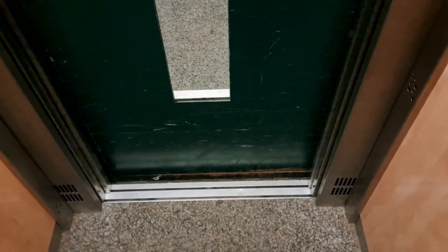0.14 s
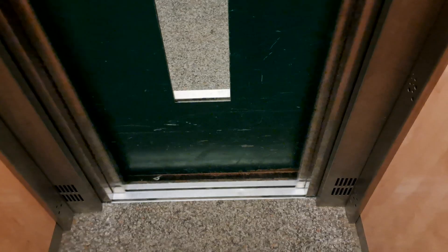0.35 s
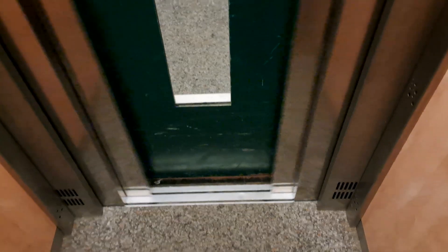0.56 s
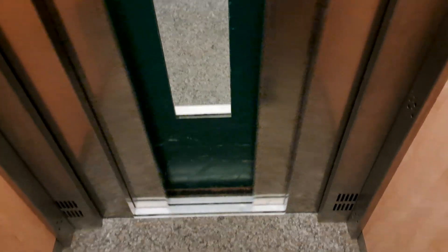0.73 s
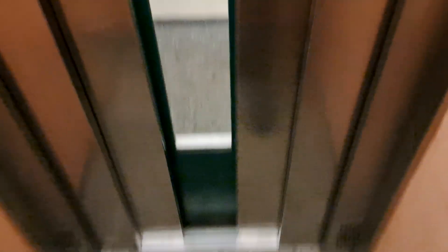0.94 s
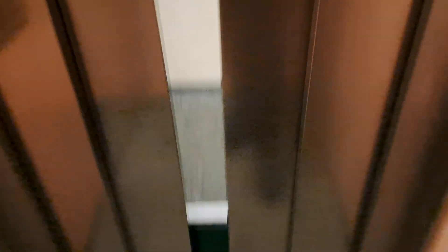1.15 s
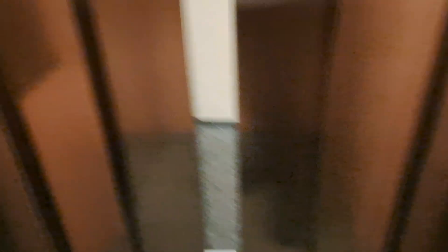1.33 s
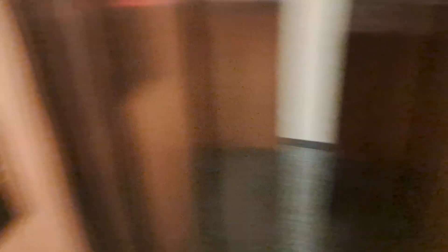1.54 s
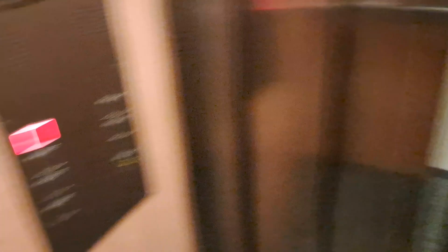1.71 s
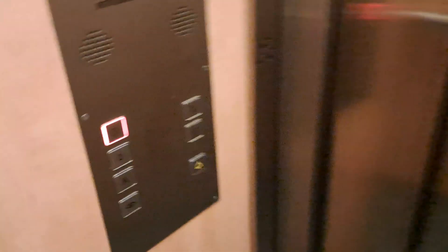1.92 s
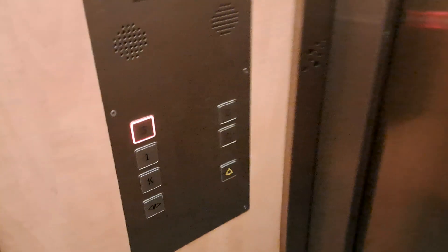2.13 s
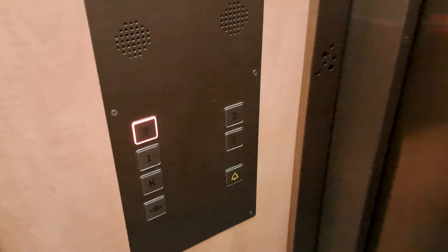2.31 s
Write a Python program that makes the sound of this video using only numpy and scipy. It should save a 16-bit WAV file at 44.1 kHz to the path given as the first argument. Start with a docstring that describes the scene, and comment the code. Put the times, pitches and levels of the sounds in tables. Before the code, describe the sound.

Sliding lift doors close, heard inside a small car: a brief thin squeal, catch ticks and a hard latch clack, then rolling panels with hiss and squeaks, fading before a soft boomy thud. Close stereo microphone.

```python
"""Inside a small lift car, a stereo microphone hears telescopic doors driven shut in a low hum and still air.
A thin squeal and short squeaks (narrowed noise), catch ticks and latch clacks (struck modes with a crack of
noise), with panels that roll and hiss (bumped resonances, shaped noise), sing and fade. They meet with
a thud that booms in the car's low modes (swelling sines). A faint steady whine lies above it all.
"""
import sys
import numpy as np
from scipy import signal
from scipy.fft import rfft, irfft
from scipy.io import wavfile
from scipy.ndimage import uniform_filter1d

SR = 44100
rng = np.random.default_rng(int(sys.argv[2]) if len(sys.argv) > 2 else 0)


def gain_from_decibels(decibels):
    """Convert decibel values to linear amplitude factors."""
    exponent = np.asarray(decibels, float) / 20
    return 10 ** exponent


def persist_wave(psi):
    """Save psi, clipped to +-1, as 16-bit WAV."""
    counts = np.round(np.clip(psi, -1, 1) * 32767).astype(np.int16)
    wavfile.write(sys.argv[1], SR, np.atleast_2d(counts).T)


N = 108706
T = np.arange(N) / SR


def evened(x):
    """Scales to unit rms."""
    return x / np.sqrt(np.mean(x ** 2) + 1e-20)


def column(table, index):
    """One column of a curve, drawn sample by sample between its times."""
    rows = np.array(table)
    return np.interp(T, rows[:, 0], rows[:, index])


def read(points, hz):
    """A spectrum table read on a log-frequency axis."""
    f, value = np.transpose(points)
    return np.interp(np.log(hz + 1), np.log(f + 1), value)


def coloured(x, points):
    """Filters along time by a spectrum table; unit rms."""
    hz = np.fft.rfftfreq(x.shape[-1], 1 / SR)
    spectrum = rfft(x) * gain_from_decibels(read(points, hz))
    return evened(irfft(spectrum, x.shape[-1]))


def resonate(x, hz, width):
    """Shifts hz down to zero, smooths, and shifts back: a resonance of gain 1."""
    turn = np.exp(2j * np.pi * np.cumsum(hz * np.ones(x.shape[-1])) / SR)
    r = np.exp(-np.pi * width / SR)
    smoothed = signal.lfilter([1 - r], [1, -r], x / turn)
    return 2 * (turn * smoothed).real


def slow(rate_hz):
    """Smooth chance, unit rms: noise averaged twice over 1 / rate_hz."""
    size = max(int(SR / rate_hz), 2)
    noise = rng.standard_normal(N)
    return evened(uniform_filter1d(uniform_filter1d(noise, size), size))


def shake():
    """The door drive keeps the car's low modes humming, each wavering in pitch and strength."""
    # low modes of the car: [f/Hz, level/dB, waver/Hz, share taken of the other modes' relative level]
    car_modes = [(31.9, -7, 8.1, 0.0067), (52.3, 1, 2.75, 0.01), (78.4, 0.5, 7.16, 0.98),
                 (97.6, -5, 8.1, 1)]
    # shake of the car by the drive: [t/s, level/dB of the 53 Hz mode, other modes relative/dB]
    drive_curve = [(0.0, -43, 4.5), (0.06, -26, -21), (0.1, -44, 1), (0.41, -42, -4), (0.45, -30, -16.5),
                   (0.92, -34.5, 1.5), (0.99, -42.5, 4.5), (1.05, -32, -11.5), (1.41, -36.5, -7),
                   (1.49, -49.5, -2.5), (1.66, -42.5, -5), (1.71, -43, -5.5), (1.88, -49.5, -4.5),
                   (1.93, -64, 17), (1.97, -52.5, 6), (2.06, -49, -10)]
    other_db = column(drive_curve, index=2)
    hum = 0
    for hz, db, waver, share in car_modes:
        pitch = hz + waver * 0.566 * slow(16.3)
        strength = gain_from_decibels(db + share * other_db + 1.8 * slow(waver * 2))
        hum = hum + strength * np.sin(2 * np.pi * np.cumsum(pitch) / SR)
    return np.tile(hum * np.sqrt(2) * gain_from_decibels(column(drive_curve, index=1)), (2, 1))


def rolling():
    """Rollers bump along the track and ring the panels, over a broad wash."""
    # rolling of the panels: [t/s, level/dB, extra level/dB of the upper rings]
    roll_curve = [(0, -44, 9.5), (.08, -59, -19), (.22, -50.5, 11), (.32, -42, 7.5), (.45, -38, 9.5),
                  (.57, -33.5, -0.5), (.75, -36.5, 3.5), (.82, -32, 2), (.95, -37.5, 1.5), (1.03, -40, 3),
                  (1.2, -42, -1), (1.38, -50.5, 6), (1.48, -60, -4), (1.56, -64, -13), (1.75, -60, 7.5),
                  (1.9, -64.5, -12), (2.08, -54.5, 1), (2.3, -48.5, 3), (2.46, -58, -5.5)]
    # panels under the rollers: [f/Hz, half the width of each resonator/Hz, level/dB]
    panels = [(163.7, 38.3, -2), (269, 23.6, -3), (298, 34.4, -0.5), (337.8, 8.3, -13.5), (396.6, 19, -5.5),
              (488, 27, -11), (629, 77, -13.5), (754, 158, -11.5), (1165, 94, -14), (1850, 160, -16.5)]
    # colour of the wash: [f/Hz, relative level/dB per Hz]
    wash_colour = [(71, -3), (120, -2), (311, 22.5), (544, -10), (1590, -61), (1870, -1), (4000, -5),
                   (5200, -71)]
    bumps_per_s, upper_hz, wash_db = 520, 600, -10.5
    bumps = rng.random((2, N)) < bumps_per_s / SR
    signed_bumps = bumps * rng.choice([-1., 1.], (2, N))
    drive = evened(signed_bumps) + 0.66 * rng.standard_normal((2, N))
    upper = gain_from_decibels(column(roll_curve, index=2))
    rings = 0
    for hz, width, db in panels:
        once = resonate(drive, hz * (1 + 0.0031 * slow(4.6)), width * 2)  # pitch drifts slightly
        ring = evened(resonate(once, hz, width * 2))
        lift = upper if hz > upper_hz else 1
        rings = rings + gain_from_decibels(db + 0.78 * slow(6.7)) * lift * ring
    wash = coloured(drive, wash_colour) * gain_from_decibels(wash_db) * np.sqrt(upper)  # half the extra dB
    uneven_db = 1.3 * slow(14.)
    return (0.86 * rings + wash) * gain_from_decibels(column(roll_curve, index=1) + uneven_db)


def hiss():
    """A soft sliding hiss: noise that swells and fades, duller or brighter, in uneven patches."""
    # [t/s, level/dB, brightness 0-1]
    hiss_curve = [(0, -54, 0), (.07, -112, 0), (.2, -69, 1), (.21, -43.5, 0), (.33, -48, 0),
                  (.45, -46.5, 0), (.53, -40.5, 0.13), (.66, -38, 0.16), (.77, -41.5, 0.21),
                  (.9, -44.5, 0.27), (.95, -53, 0), (1.18, -54.5, .5), (1.48, -54, .3), (1.57, -66, .3),
                  (1.72, -55.5, .6), (1.89, -52, .9), (1.99, -54, .8), (2.07, -61, .5), (2.2, -65.5, 0.8),
                  (2.46, -62.5, 1)]
    # colours of the hiss at its dullest and brightest: [f/Hz, relative level/dB per Hz]
    dull = [(1470, -7), (2500, -9), (2830, -11.5), (4470, -14.5), (8060, -14.5), (13800, -21), (15600, -37)]
    bright = [(2060, -11), (3500, -6.5), (6530, -1), (7360, 1), (8600, -3), (13200, 2.5), (15600, -26)]
    patchy_db = 1.7
    brightness = np.clip(column(hiss_curve, index=2), 0, 1)
    noise = rng.standard_normal((2, N))
    mix = (1 - brightness) * coloured(noise, dull) + brightness * coloured(noise, bright)
    # patches over frequency and time, alike in both channels
    z = signal.stft(mix, nperseg=256)[2]
    patches = uniform_filter1d(rng.standard_normal(z.shape[1:]), size=5, axis=0)
    patches = uniform_filter1d(patches, size=8, axis=1)
    mix = signal.istft(z * gain_from_decibels(patchy_db * evened(patches)), nperseg=256)[1][:, :N]
    return mix * gain_from_decibels(column(hiss_curve, index=1) + .7 * slow(70.))


def air():
    """Still air of the car: steady noise with a fixed colour."""
    # [f/Hz, relative level/dB per Hz]
    air_colour = [(24, -52), (40, 0.5), (85, -12), (150, -17.5), (280, -43), (600, -34.5), (2200, -36.5),
                  (3200, -54), (5000, -59.5), (13500, -49.5), (15600, -45)]
    return coloured(rng.standard_normal((2, N)), air_colour) * gain_from_decibels(-44.5)


def whine():
    """A faint steady high whine: one sine, its phase offset between the sides, its level wavering a little."""
    hz, level_db = 14278, -68.5
    phase = np.array([[0], [.8]])
    return gain_from_decibels(level_db + 1.5 * slow(12.)) * np.sin(2 * np.pi * hz * T + phase)


def whistle(curve, width_hz=130):
    """A thin fuzzy tone: noise through two narrow resonances that follow a pitch curve."""
    hz = column(curve, index=1)
    noise = rng.standard_normal((2, N))
    tone = evened(resonate(resonate(noise, hz, width_hz), hz, width_hz))
    sounding = (T > curve[0][0]) * (T < curve[-1][0])
    return tone * gain_from_decibels(column(curve, index=2)) * sounding


def squeaks():
    """Rubbing metal squeaks briefly: each squeak is a short arch of whistle at one pitch."""
    # [t/s, length/s, f/Hz, level/dB]
    squeak_rows = [(0.091, 0.057, 10200, -57), (0.757, 0.054, 6560, -46.5), (0.92, 0.051, 9910, -58.5),
                   (0.972, 0.033, 6640, -58), (1.029, .03, 3090, -56), (0.608, 0.082, 8120, -44.5),
                   (.675, 0.043, 3980, -51)]
    arch = [(0, -15), (.25, 0), (.65, 0), (1, -15)]  # part of the length, dB
    return sum(whistle([(s + length * part, hz, db + fade) for part, fade in arch])
               for s, length, hz, db in squeak_rows)


def squeal():
    """A thin fuzzy whistle of rubbing metal, wandering in pitch."""
    # [t/s, f/Hz, level/dB]
    squeal_curve = [(0.1, 8040, -81), (0.122, 8760, -48.5), (0.182, 7920, -48), (0.276, 8420, -60),
                    (0.3, 8200, -71)]
    return whistle(squeal_curve)


def blows(rows, modes, crack):
    """Each blow is a firm first contact and a short rattle that rings the modes, with a dying crack of noise."""
    colour, crack_db, crack_t60 = crack
    rise_cycles = 4  # a struck mode builds up over this many cycles
    t = T[:SR // 2]
    ring = sum(gain_from_decibels(db - 60 * t / t60) * np.minimum(t * hz / rise_cycles, 1) * np.sin(2 * np.pi * hz * t)
               for hz, db, t60 in modes)
    out = np.zeros((2, N))
    for s, db, length, pan_db in rows:
        u = np.maximum(T - s, 0)
        a, b, c, d = rng.standard_normal((4, N))
        rattle = np.array([a, .1 * a + b]) * (T >= s) * np.exp(-u / length)
        rattle[:, round(s * SR)] = np.sqrt(length * SR)  # first contact
        rung = signal.fftconvolve(rattle, ring[None], axes=1)[:, :N]
        rung /= np.sqrt(uniform_filter1d((rung ** 2).mean(0), 440).max())  # loudest 10 ms to unit rms
        snap = coloured(np.array([c, .5 * c + 0.65 * d]), colour)
        snap *= np.minimum(u / .0025, 1) * gain_from_decibels(crack_db - 60 * u / crack_t60)
        pan = np.array([[pan_db / 2], [-pan_db / 2]])
        out += (rung + snap) * gain_from_decibels(db + pan)
    return out


def ticks():
    """The catch ticks: light blows ring its small modes."""
    # [t/s, level/dB, rattle decay/s, left-right/dB before the hits' common balance]
    tick_rows = [(.204, -36, .008, -5), (.2095, -33, .025, -5), (1.49, -62, .02, -3),
                 (2.284, -54, .003, -3)]
    # modes of the catch: [f/Hz, level/dB, t60/s]
    catch = [(620, -17, .08), (1590, -12, .06), (2100, -3, .15), (2300, -2, .035), (2550, -2, .035),
             (2810, -4, .04), (3700, -15, .04)]
    # crack of a tick: colour [f/Hz, relative level/dB per Hz], then level/dB, t60/s
    tick_crack = ([(180, -45), (300, -26.5), (1200, -29), (2110, -0.5), (3460, -39), (9640, -29),
                   (15600, -40)], -1, 0.17)
    return blows(tick_rows, catch, tick_crack)


def clacks():
    """The latch clacks: a lighter and a hard blow ring its modes."""
    # [t/s, level/dB, rattle decay/s, left-right/dB before the hits' common balance]
    clack_rows = [(.334, -38, .005, -3.5), (.341, -17, 0.007, -3.5)]
    # modes of the latch: [f/Hz, level/dB, t60/s]
    latch = [(320, -8, .3), (400, -4, .22), (530, -7, .14), (640, -7, .12), (1218, -13, .15),
             (1431, -12, .12), (1580, 2, .065), (1790, -1, .06), (2137, -15, .1), (2880, -19, .06),
             (3700, -21, .06)]
    # crack of a clack: colour [f/Hz, relative level/dB per Hz], then level/dB, t60/s
    clack_crack = ([(250, -34), (420, -14), (700, -10), (1590, -8), (2340, -11), (5090, -25.5), (7620, -20),
                    (15600, -35)], -2, 0.17)
    return blows(clack_rows, latch, clack_crack)


def singing():
    """A thin tone of narrowed noise that sings and drifts while the panels slide."""
    # [t/s, f/Hz, level/dB]
    sing_curve = [(.42, 1860, -55), (.69, 1880, -53), (.72, 1765, -52), (.79, 1790, -48), (.86, 1830, -51),
                  (1.2, 1845, -59), (1.32, 1800, -70)]
    return whistle(sing_curve, width_hz=45)


def thuds():
    """The panels meet: two close blows ring their edges."""
    # [t/s, level/dB, rattle decay/s, left-right/dB before the hits' common balance]
    thud_rows = [(2.099, -39, 0.023, -1.5), (2.113, -43.5, 0.083, -7)]
    # modes of the panel edges: [f/Hz, level/dB, t60/s]
    edges = [(491, 8.5, 0.2), (606, 3.5, 0.11), (717, 7.5, 0.18), (1080, 0.5, 0.16)]
    # crack of a thud: colour [f/Hz, relative level/dB per Hz], then level/dB, t60/s
    thud_crack = ([(110, -22), (180, -9), (419, -9), (1210, -26), (2160, -26), (5500, -35), (15600, -46)],
                   8, .3)
    return blows(thud_rows, edges, thud_crack)


def boom():
    """The thud sets the car's low modes swelling and dying; the higher ones waver unevenly."""
    # [f/Hz, level/dB at the peak, time to peak/s, sharpness of the swell]
    boom_modes = [(33, -32, .28, 2.5), (107, -29, .06, 2.5), (190, -34, .014, 1.2), (240, -35, .05, 1.5),
                  (54, -22, .12, 6.), (53.2, -23.5, .24, 1.1), (83, -21, .075, 2.5), (298, -28, .05, 2.8),
                  (336, -24, .026, 1.5)]
    start_s, rough_above_hz, rough_db = 2.099, 150, 2
    u = np.maximum(T - start_s, 0)
    low = 0
    for hz, db, peak, sharp in boom_modes:
        swell = (u / peak * np.exp(1 - u / peak)) ** sharp
        uneven_db = (hz > rough_above_hz) * rough_db * slow(60.)
        low = low + gain_from_decibels(db + uneven_db) * swell * np.sin(2 * np.pi * hz * u)
    return np.tile(low, (2, 1))


def cabin(x):
    """Dense quick reflections between the close walls: a dying noise tail after a 3 ms gap."""
    t60_s, level_db = .2, -10
    t = T[:SR // 3]
    tail = rng.standard_normal((2, len(t))) * gain_from_decibels(-60 * t / t60_s) * (t > .003)
    tail /= np.linalg.norm(tail[0])
    return x + gain_from_decibels(level_db) * signal.fftconvolve(x, tail, axes=1)[:, :N]


def leaned(pair, lean):
    """Left-right balance that depends on frequency."""
    gain = gain_from_decibels(read(lean, np.fft.rfftfreq(N, 1 / SR)) / 2)
    return irfft(rfft(pair) * np.array([gain, 1 / gain]), N)


def ports(pair):
    """Two microphone ports: the right one blends both channels by a likeness per frequency, then balance."""
    # [f/Hz, left-right likeness 0-1 of two unrelated channels]
    likeness = [(60, 0.97), (130, 0.8), (290, 0.86), (640, 0.39), (1300, 0.06)]
    # balance of the steady sounds: [f/Hz, left-right/dB]
    steady_lean = [(60, 3), (130, -1), (290, -1), (640, 2), (1410, -5.5), (3100, -0.5), (6820, 7),
                   (15000, 1.5)]
    a, b = rfft(pair)
    same = np.clip(read(likeness, np.fft.rfftfreq(N, 1 / SR)), 0, 1)
    right = same * a + np.sqrt(1 - same ** 2) * b
    return leaned(irfft(np.array([a, right]), N), steady_lean)


def scene():
    """Steady layers and boom through the ports, blows through the cabin, the whine straight in."""
    # balance of the blows: [f/Hz, left-right/dB]
    hit_lean = [(60, 1.5), (250, 0), (600, 8), (1650, -3), (4970, 3), (15000, 5)]
    steady = shake() + rolling() + hiss() + air() + squeaks() + squeal() + singing() + boom()
    hits = ticks() + clacks() + thuds()
    return ports(steady) + leaned(cabin(hits), hit_lean) + whine()


def top_cut(x):
    """Nothing passes above the cut-off."""
    return signal.sosfilt(signal.butter(12, 15710, fs=SR, output="sos"), x)


def record(dry):
    """Limits the band with a steep low-pass at 15.6 kHz and finishes the mix."""
    taps = signal.firwin(401, 15600, window=("kaiser", 9), fs=SR)
    mix = signal.oaconvolve(dry, taps[None], "same", axes=1)
    return top_cut(mix)


dry = scene()
out = record(dry)
persist_wave(out)
```